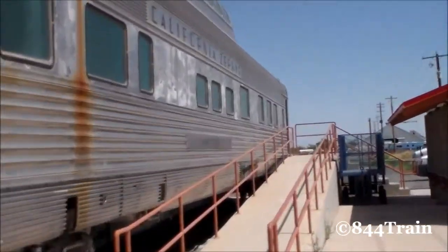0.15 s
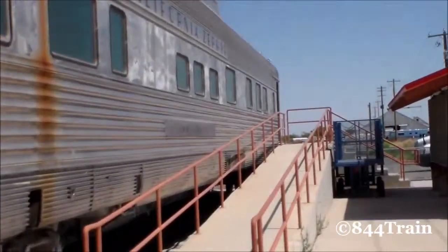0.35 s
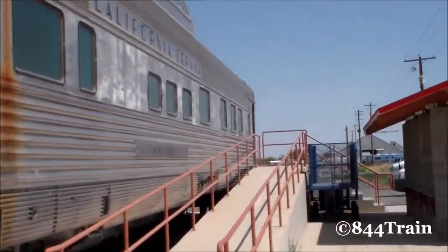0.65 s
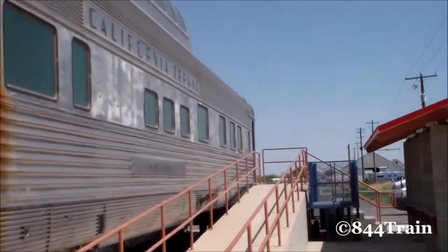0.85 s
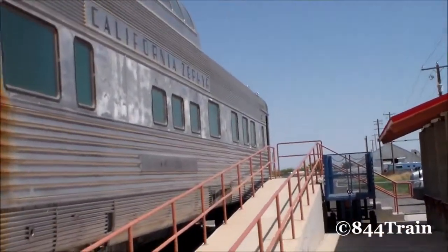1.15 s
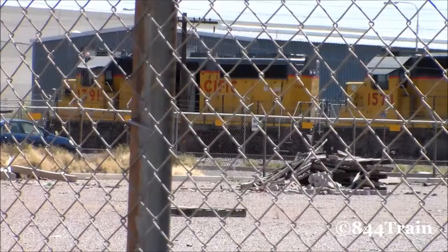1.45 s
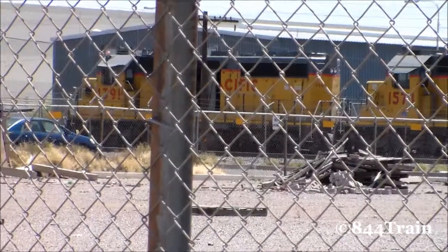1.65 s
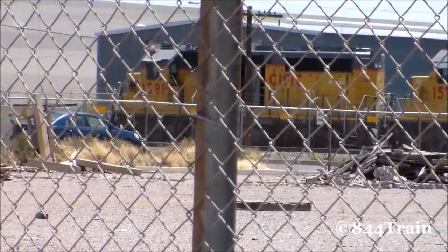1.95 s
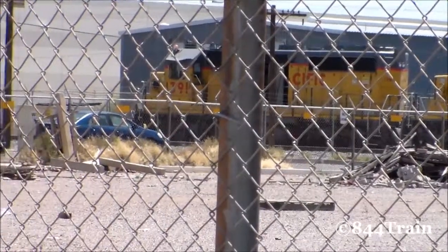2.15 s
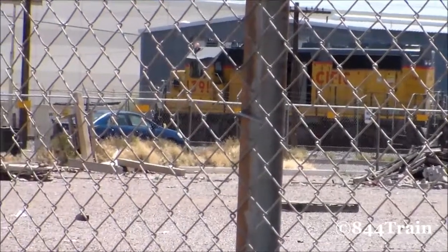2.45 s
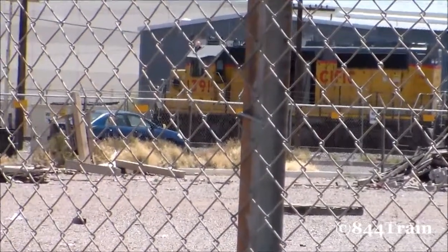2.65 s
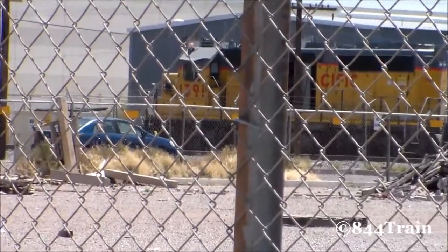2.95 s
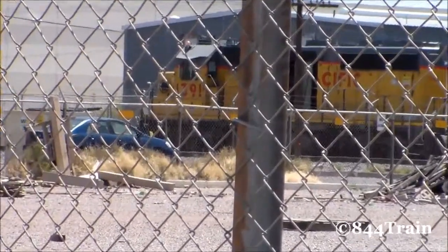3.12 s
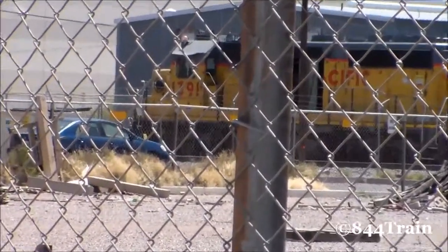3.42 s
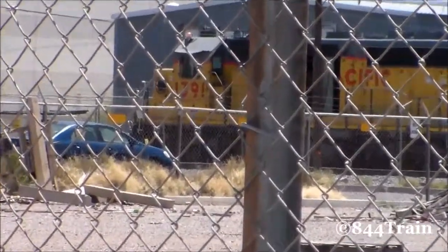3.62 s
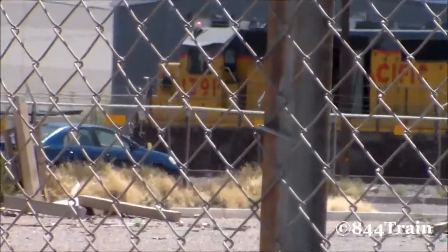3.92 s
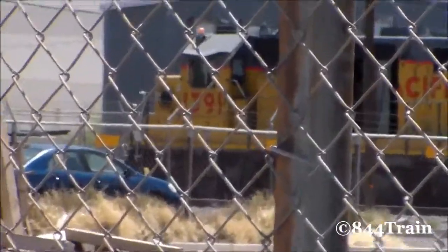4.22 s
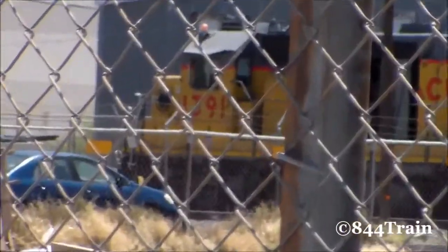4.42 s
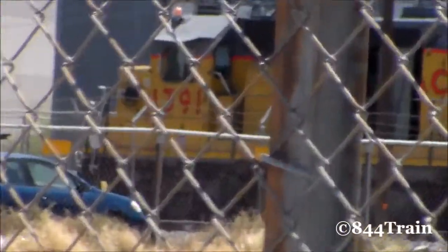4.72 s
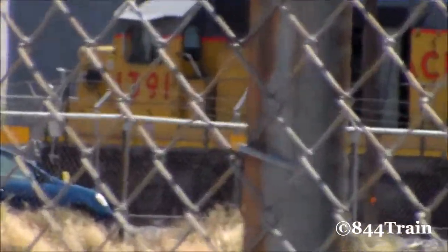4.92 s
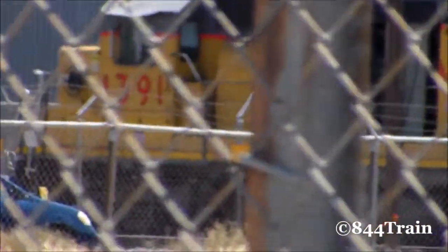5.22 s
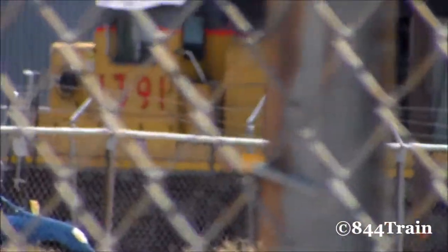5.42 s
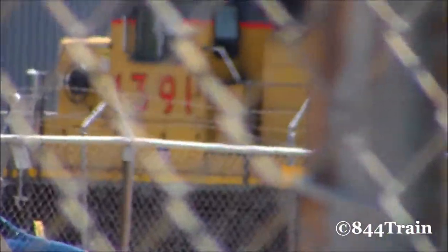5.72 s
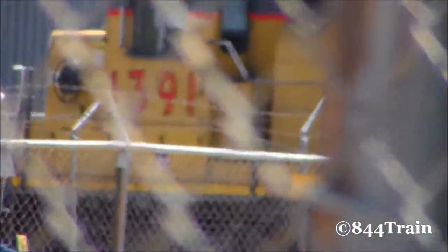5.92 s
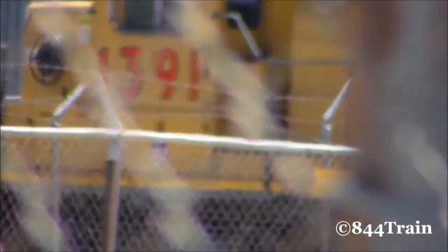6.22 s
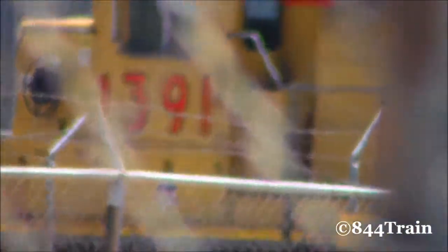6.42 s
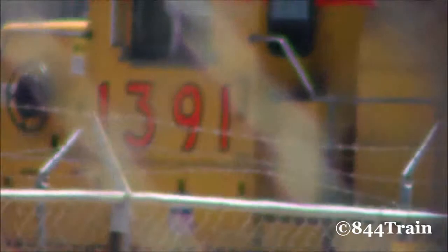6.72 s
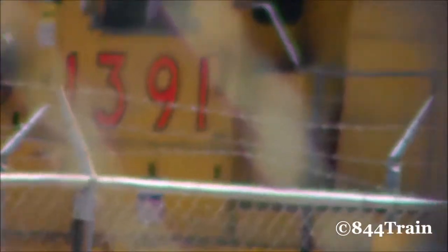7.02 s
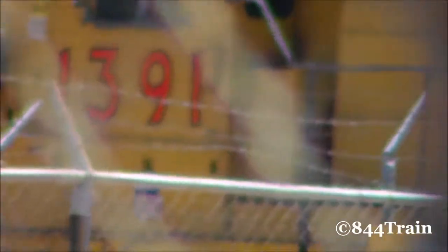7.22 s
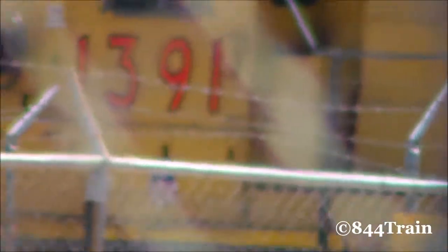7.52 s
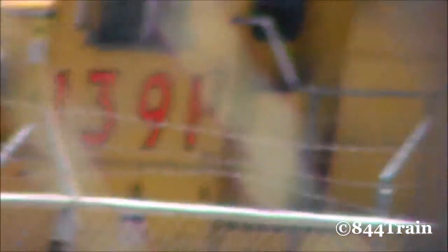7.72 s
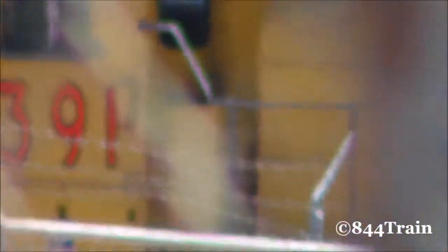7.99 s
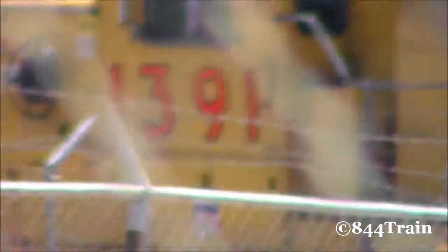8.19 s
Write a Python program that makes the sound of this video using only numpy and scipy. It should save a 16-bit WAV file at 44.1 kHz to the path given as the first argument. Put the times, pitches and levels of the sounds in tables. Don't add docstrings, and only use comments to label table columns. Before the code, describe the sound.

Just over a second of bassy wind buffeting with faint far machinery and a snappy camera click, then a hard short silence. The rest is idling diesel engines across an open yard: beating low rumble, broad fan noise, blower tones, drifting high turbo whistle, plus occasional exhaust knocks and small ticks of the camera body.

```python
import sys
import numpy as np
from scipy import signal
from scipy.fft import rfft, irfft, next_fast_len
from scipy.io import wavfile
from scipy.ndimage import uniform_filter1d

SR = 44100
rng = np.random.default_rng(int(sys.argv[2]) if len(sys.argv) > 2 else 0)


def transcribe(signal):
    frames = np.atleast_2d(signal).T
    limited = np.clip(frames, -1, 1)
    pcm = np.round(limited * 32767).astype(np.int16)
    wavfile.write(sys.argv[1], SR, pcm)


def volts(x):
    e = np.asarray(x, float) / 20
    return 10 ** e


N = 368235
T = np.arange(N) / SR


def curve(table, x, log=False):
    at, *columns = np.transpose(table)
    if log:
        x, at = np.log(x), np.log(at)
    return [np.interp(x, at, column) for column in columns]


def walk(rate_hz):
    hold = int(SR / rate_hz)
    steps = np.repeat(rng.standard_normal(N // hold + 1), hold)
    return 1.36 * uniform_filter1d(uniform_filter1d(steps, hold), hold)[:N]


def band(x, lo_hz, hi_hz):
    return signal.sosfilt(signal.butter(2, [lo_hz, min(hi_hz, .45 * SR)], "band", fs=SR, output="sos"), x)


def tone(turns, db):
    return np.sqrt(2) * volts(db) * np.cos(2 * np.pi * turns)


def peak(s, half_s):
    return np.maximum(1 - np.abs(T - s) / half_s, 0)


def noise(spectrum, side, swell_db, flicker_db, flicker_hz, ref_hz):
    size = next_fast_len(N, True)
    hz = np.maximum(np.arange(size // 2 + 1) * SR / size, 1)
    mid_shape = volts(curve(spectrum, hz, True)[0])
    side_shape = mid_shape * volts(curve(side, hz, True)[0])
    spec = rfft(rng.standard_normal((2, size))) * np.array([mid_shape, side_shape])
    out, swell = 0, walk(1.49)
    for octave in np.arange(4, 14.6, .5):
        weight = np.cos(np.pi / 2 * np.clip(2 * (np.log2(hz) - octave), -1, 1)) ** 2
        level_db = swell_db * swell + flicker_db * walk(flicker_hz)
        out = out + irfft(spec * weight, size)[:, :N] * volts(level_db)
    return out / np.std(band(out[0], *ref_hz))


NEAR_HZ, SECOND_HZ, THIRD_HZ = 5.295, 6.372, 41.98
# crank_multiple, level_db
NEAR_ORDERS = [(8, -37.5), (9, -49), (11, -52), (12, -46), (14, -41), (15, -35), (16, -41), (17, -38),
               (18, -45), (21, -54), (29, -50), (31, -49), (33, -50)]
# crank_multiple, level_db
SECOND_ORDERS = [(4, -47), (5, -54), (6, -39), (9, -55), (10, -53), (12, -52), (15, -48), (18, -43),
                 (24, -48)]


def engines():
    cancel_s = 5.9

    def near_turns(k, t):
        return k * (NEAR_HZ * t - .105) - .0735 * (k - 16) ** 2

    near = sum(tone(near_turns(k, T), db + walk(1.96)) for k, db in NEAR_ORDERS)
    second = sum(tone(k * (SECOND_HZ * T + .088), db + 1.5 * walk(2)) for k, db in SECOND_ORDERS)
    third = tone(THIRD_HZ * (T - cancel_s) + near_turns(8, cancel_s) + .5, -33.5)
    return near + second + third


def crank_phase():
    return 2 * np.pi * NEAR_HZ * (T - 2.81)


# pitch_hz, level_db, flutter_db
MACHINE_TONES = [(173.5, -47, 3), (229.4, -43, 2.5), (249, -50, 3), (305.9, -45, 2.5), (375.9, -45, 2.5),
                 (413, -47, 3), (418.27, -41, 2), (460.7, -50, 3), (524.2, -53, 3), (688.4, -52, 3),
                 (830, -52, 3), (836.5, -52, 3), (1254.8, -46, 2), (1494.2, -47.5, 2.5), (1513, -56, 3),
                 (1528, -59, 3), (2904, -64, 3)]
# time_s, level_db
COMPRESSOR_HUM = [
    (7.1, -70),
    (7.4, -44),
    (8.35, -43),
]


def machine_tones():
    out = 0
    for hz, db, flutter_db in MACHINE_TONES:
        flutter = flutter_db * (walk(4.014) + walk(18)) / np.sqrt(2)
        pulse_db = 2 * np.cos(crank_phase() + hz)
        out = out + tone(hz * T + 0.043 * flutter_db * walk(8), db + flutter + pulse_db)
    return out + tone(207 * T, curve(COMPRESSOR_HUM, T)[0] + 3.1 * walk(5))


# start_s, peak_db, hold_s, fade_s
WHISTLE_DRIFTS = [(1.35, -55, 0.33, .15), (1.8, -59, .1, .1), (2.1, -61, .3, .1), (2.46, -48.5, 0.45, .5),
                  (3.45, -61, .12, .1), (4.3, -62.5, .9, .1), (5.3, -55, 0.22, .2), (6.1, -58.5, .6, .12),
                  (6.85, -57.5, .2, .1), (7.08, -52.5, .15, .1), (7.26, -48, 1.2, .1)]


def whistle_db():
    faint_db, rise_s = -65, 0.11
    lifts = [(db - faint_db) * np.interp(T, np.cumsum([s, rise_s, hold, fade]), [0, 1, 1, 0])
             for s, db, hold, fade in WHISTLE_DRIFTS]
    return faint_db + np.max(lifts, axis=0)


def turbo_whistle():
    crank = crank_phase()
    climb_hz = 2 * (T - 6)
    hz = 4446 + climb_hz + 9.0 * np.cos(crank) + 4 * walk(12)
    beads_db = 2.2 * np.cos(8 * crank + 3 * walk(10)) + 1.5 * walk(90)
    return tone(np.cumsum(hz) / SR, whistle_db() + beads_db)


# pitch_hz, level_db (per Hz)
ROAR_SPECTRUM = [(20, -22), (55, -9.5), (160, -5), (267, -8), (414, -6), (760, -15), (1200, -15),
                 (1390, -21), (1640, -21), (1800, -26), (2900, -28), (4700, -38), (8000, -42), (14500, -53)]
# pitch_hz, side_minus_mid_db
ROAR_WIDTH = [(60, -16.5), (110, -24), (200, -21), (370, -26.5), (690, -21.5), (1260, -15), (2320, -11),
              (4260, -6), (7840, -1.5), (14400, 2)]
# centre_s, level_db, half_length_s
ROAR_DRIFTS = [
    (1.467, 2.5, 0.09),
    (4.093, -1.5, 0.21),
    (4.3, -0.5, .05),
    (4.373, 1, 0.024),
    (4.695, -1.7, 0.19),
    (6.5, 0.8, 0.065),
    (6.764, 0.8, .08),
    (6.956, 1.5, 0.089),
    (7.12, -1.8, 0.24),
]


def roar():
    level_db = -29.5 + sum(db * peak(s, half) for s, db, half in ROAR_DRIFTS)
    return noise(ROAR_SPECTRUM, ROAR_WIDTH, 0.11, 0.6, 14, (250, 3000)) * volts(level_db)


def yard():
    mid, side = roar()
    tones, whistle = machine_tones(), turbo_whistle()
    mid = mid + engines() + tones + whistle
    side = side + volts(-21) * band(mid, 20, 190)
    side = side + volts(-28) * np.roll(tones, 30) + volts(-15) * np.roll(whistle, 3)
    return np.array([mid + side, mid - side])


# centre_s, over_lull_db, half_length_s, left_minus_right_db
PORT_GUSTS = [(.01, 12.5, 0.11, 1), (0.104, 9, 0.092, 2), (0.208, 7.5, .1, 6), (0.375, 11, .16, 5),
              (0.48, 16.5, .03, 13), (0.598, 8, .2, 10), (0.803, 8, 0.25, 5), (1.02, 11.5, 0.057, 1),
              (1.124, 6, .04, 10), (1.184, 8.5, 0.027, -2), (1.297, 8.5, .08, -3)]


def gusts():
    lull_db, lull_pan_db = -30, 5.5
    shapes = np.array([peak(s, half) for s, _, half, _ in PORT_GUSTS])
    _, db, _, pan_db = np.array(PORT_GUSTS).T[:, :, None]
    pull_db = shapes * (pan_db - lull_pan_db)
    return lull_db + (shapes * db).max(axis=0), lull_pan_db + pull_db.sum(axis=0)


def gain_db():
    start_s, attack_s, hold_s, release_s = 0.226, 0.0091, 0.44, 0.11
    duck_db, creep_db = -15.5, 3
    times = np.cumsum([start_s, attack_s, hold_s, release_s])
    return np.interp(T, times, [0, duck_db, duck_db + creep_db, 0])


# pitch_hz, level_db (per Hz)
WIND_SPECTRUM = [(12, -47.5), (20, -19), (70, 5), (182, -2.5), (274, -16.5), (303, -16.5), (499, -29),
                 (600, -28.5), (780, -51), (1320, -120)]


def wind():
    wind_db, pan_db = gusts()
    mid, side = noise(WIND_SPECTRUM, [(20, -10), (1500, -20)], .6, 2.3, 35, (30, 300))
    pops = volts(2.3 * walk(60.05))
    mid, side = mid * pops, side * pops * volts(3.8 * walk(30))
    ironing = np.sqrt(uniform_filter1d(mid ** 2, 1800) + 0.12)
    mid, side = np.array([mid, side]) * volts(wind_db + gain_db() + 1.0) / ironing
    return np.array([mid + side, mid - side]) * volts(np.array([pan_db, -pan_db]) / 2)


# start_s, peak_db, ring_hz, width_hz, left_minus_right_db
BUTTON_CLICK = [
    (.2207, -17, 9900, 5000, 6),
    (.2239, -8, 3340, 1810, -4),
    (.2241, -3, 7100, 6000, -7),
    (.2285, -22, 4500, 4000, -2),
    (.2216, -16, 5500, 4000, 4.5),
    (.2226, -22, 8500, 5000, 1),
]
# start_s, peak_db, ring_hz, width_hz
TICKS_AND_KNOCKS = [(.489, -47, 7950, 5000), (.9828, -32, 7200, 1800), (.9828, -30, 11500, 4000),
                    (1.551, -20, 700, 500), (4.12, -21, 560, 250), (4.298, -15, 550, 250),
                    (4.554, -36.5, 8400, 1200), (4.559, -33, 6500, 3000), (4.5675, -25, 8500, 1200),
                    (4.575, -40, 6200, 2000), (8.14, -37, 3840, 400), (8.16, -35, 3800, 400),
                    (.697, -50, 7000, 5000), (1.037, -46, 8000, 8000), (1.134, -48, 9000, 6000),
                    (6.59, -33, 9500, 5000)]


def clicks():
    out, t = np.zeros((2, N)), T[:4096]
    rows = BUTTON_CLICK + [tick + (0,) for tick in TICKS_AND_KNOCKS]
    for s, db, hz, width_hz, pan_db in rows:
        shared, *separate = rng.standard_normal((3, len(t)))
        t60_s = 0.024 * np.sqrt(1000 / width_hz)
        burst = (shared + .5 * np.array(separate)) * volts(-60 * t / t60_s)
        burst[:, 0] = 9
        ring = band(burst, hz - width_hz / 2, hz + width_hz / 2)
        ring[0] = np.roll(ring[0], 2)
        ring = ring / np.abs(ring).max() * volts(db + np.array([[pan_db], [-pan_db]]) / 2)
        start = int(s * SR)
        out[:, start:start + len(t)] += ring
    return out


# pitch_hz, level_db (per Hz)
FAR_SPECTRUM = [(120, -21), (200, 1), (324, -14), (714, -21.5), (870, -21.5), (4290, -45.5), (7740, -60),
                (13300, -60.5), (14500, -62.5)]
# pitch_hz, side_minus_mid_db
FAR_WIDTH = [(200, -31), (1300, -11.5), (3000, -6), (7000, 2), (14500, 0)]


def far_yard():
    level_db = -41 + 1.0 * T + gain_db()
    mid, side = noise(FAR_SPECTRUM, FAR_WIDTH, 0.46, 1.15, 14.94, (600, 3000)) * volts(level_db)
    return np.array([band(mid + side, 266, 16000), band(mid - side, 250, 16000)])


def hiss():
    return volts(-66) * band(rng.standard_normal((2, N)), 1500, 11000)


# start_s, end_s
SILENCE_S = (1.357, 1.4628)


def scene():
    coaches = wind() + far_yard() + hiss()
    return np.where(T < np.mean(SILENCE_S), coaches, yard()) + clicks()


def roll_off(x):
    return signal.sosfilt(signal.butter(12, 15010, fs=SR, output="sos"), x)


def record(dry):
    dull = signal.sosfilt(signal.ellip(8, .2, 60, 14250, fs=SR, output="sos"), dry)
    sounding = (T < SILENCE_S[0]) | (T > SILENCE_S[1])
    return roll_off(dull * sounding)


dry = scene()
out = record(dry)
transcribe(out)
```